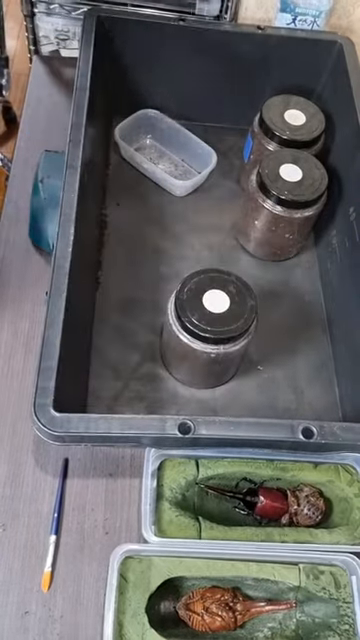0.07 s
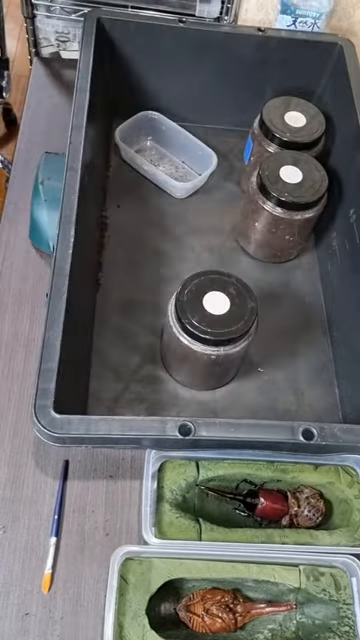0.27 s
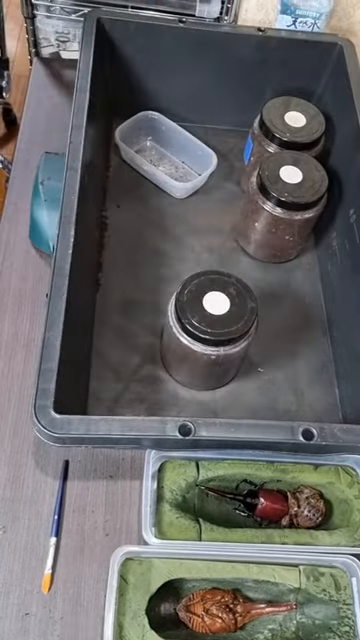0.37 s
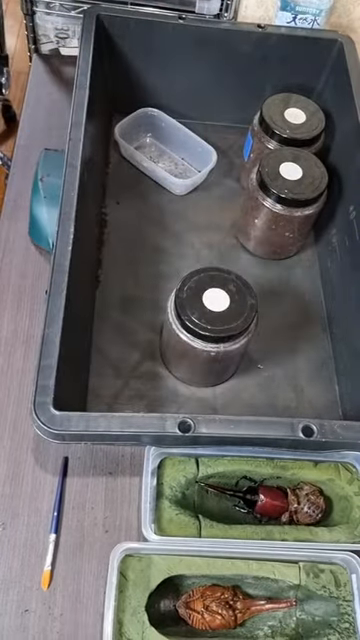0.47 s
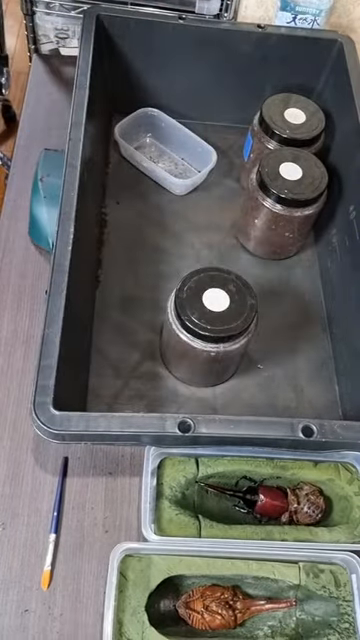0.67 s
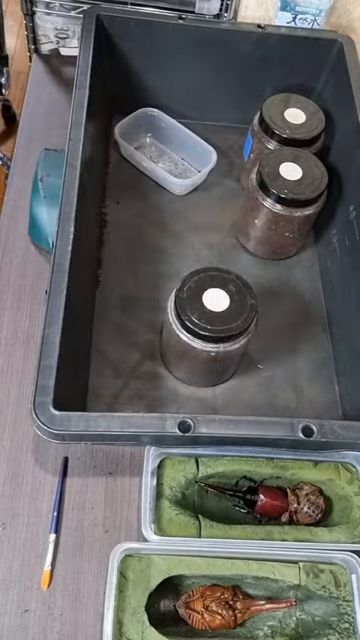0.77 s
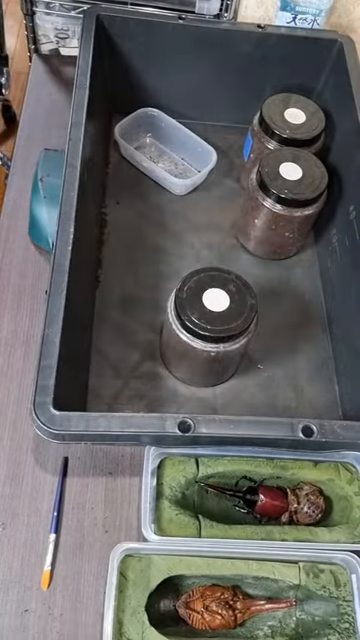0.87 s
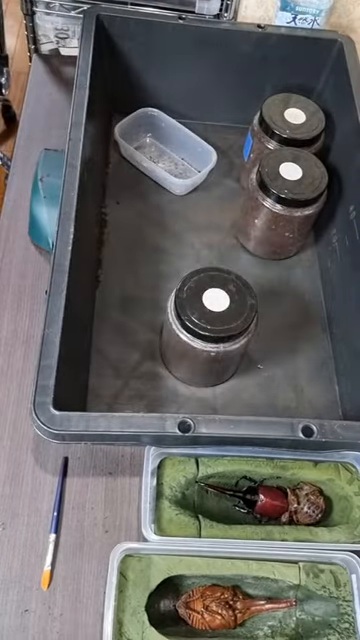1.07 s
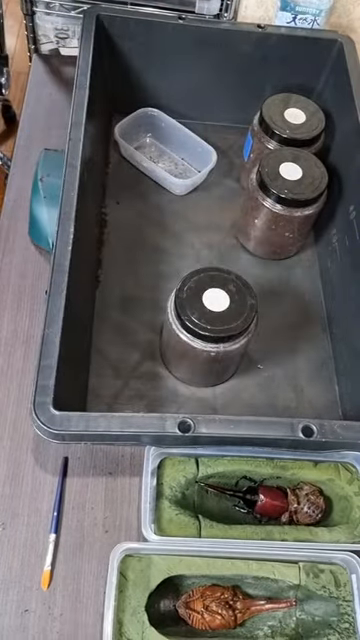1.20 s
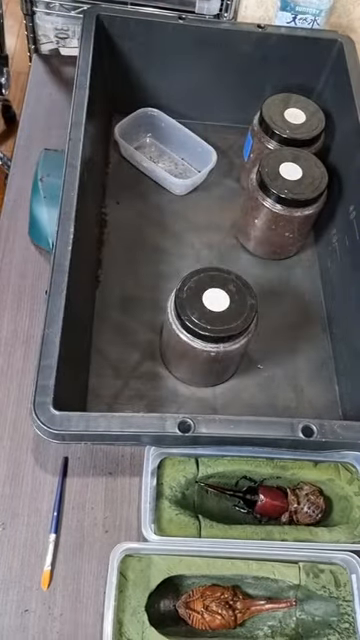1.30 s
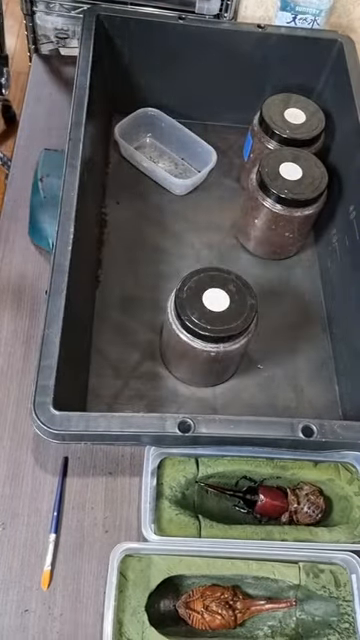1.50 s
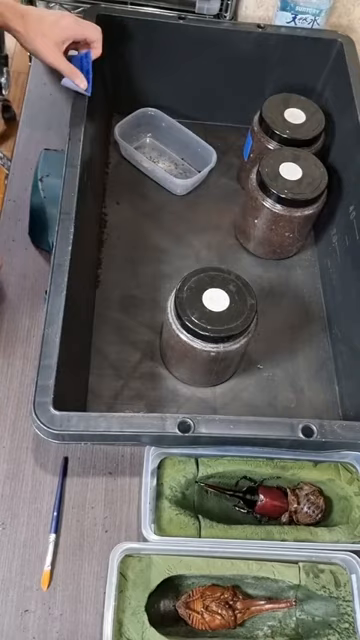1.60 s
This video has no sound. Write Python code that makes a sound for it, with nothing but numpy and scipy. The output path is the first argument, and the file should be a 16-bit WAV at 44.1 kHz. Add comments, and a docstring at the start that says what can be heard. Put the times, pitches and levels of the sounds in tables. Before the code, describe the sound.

Dry, scratchy rustling is heard close by in a quiet room with a faint machine hum. From 0.2 to 0.6 seconds, something scrapes and snaps among plastic boxes, knocking them hollowly on a table, loudest near 0.4. A small tick at 0.7 leads into a lull. Two very short creaks come around 1.1 seconds, then more scrapes, snaps and light knocks until 1.4, leaving only the hum.

```python
"""A faint machine hum in a quiet room; then, close by, something dry is handled among plastic boxes.
It catches and lets go in crisp snaps and drags in short scrapes, dense runs of tiny catches.
Both are friction noise ringing the object's resonances. Harder catches knock hollow plastic on a table.
Near the end, stick and slip judders twice in a creak."""
import sys
import numpy as np
from scipy import signal
from scipy.fft import rfft, irfft
from scipy.io import wavfile

SR = 44100
rng = np.random.default_rng(int(sys.argv[2]) if len(sys.argv) > 2 else 0)


def put_to_file(sound):
    """Save the sound as 16-bit audio at rate SR, in the file named by the first command-line argument."""
    columns = np.atleast_2d(sound).T  # one column per channel
    safe = np.clip(columns, -1, 1)
    whole_steps = np.round(safe * 32767)
    wavfile.write(sys.argv[1], SR, whole_steps.astype(np.int16))


N = 72765
T = np.arange(N) / SR
HZ = np.fft.rfftfreq(N, 1 / SR)
WAVER_HZ = 11.3


def amp(db):
    """Decibels to gain."""
    return 10 ** (np.asarray(db) / 20)


def unit(x):
    """Scale to rms 1."""
    return x / np.sqrt(np.mean(x ** 2) + 1e-20)


def curve(points):
    """(freq_hz, value) rows interpolated onto HZ, log axis."""
    freq_hz, value = np.transpose(points)
    return np.interp(np.log(HZ + 1), np.log(freq_hz), value)


def drift(rate_hz):
    """Random wander up to rate_hz, rms 1."""
    return unit(irfft(rfft(rng.standard_normal(N)) / (1 + (HZ / rate_hz) ** 4), N))


def resonate(x, freq_hz, width_hz):
    """Resonance, peak gain 1."""
    return signal.lfilter(*signal.iirpeak(freq_hz, freq_hz / width_hz, SR), x)


def low_cut(x, edge_hz):
    """Fourth-order high-pass."""
    return signal.sosfilt(signal.butter(4, edge_hz, "high", fs=SR, output="sos"), x)


def stereo_noise(gain):
    """Shaped noise at two microphones: alike in the bass, nearly unrelated in the treble."""
    # left-right likeness: freq_hz, coherence
    likeness = [(30, 1), (100, 0.5), (200, 0.87), (600, 0.93), (1300, 1), (3000, 0.31), (6000, 0),
                (12000, 0.16)]
    # left phase lead: freq_hz, phase_rad
    lead = [(300, 0), (1300, 0.25), (3000, 0.0027), (6000, 1.09), (12000, 1.8)]
    # left over right: freq_hz, level_db
    balance = [(100, 0.5), (300, 0.8), (1200, 0.6), (3000, 0), (6000, 0), (10000, -1.1)]
    common, separate = rfft(rng.standard_normal((2, N)))
    coherence, lean = np.clip(curve(likeness), 0, 1), amp(curve(balance) / 2)
    left = common * np.exp(1j * curve(lead)) * lean
    right = (coherence * common + np.sqrt(1 - coherence ** 2) * separate) / lean
    return irfft(np.array([left, right]) * gain, N)


def hum_line(pitch_hz, waver):
    """Sine wavering in strength and phase, rms 1."""
    strength = 1 + waver * drift(WAVER_HZ)
    return unit(strength * np.sin(2 * np.pi * pitch_hz * T + waver * drift(WAVER_HZ)))


def machine_hum():
    """Three faint lines over a low drone that swells and fades."""
    # hum lines: pitch_hz, level_db, waver_depth
    lines = [(462.9, -56, 0.054), (355, -70, 1), (586, -78.5, 1)]
    # drone envelope: time_s, level_db
    swell = [(0, -66.5), (.07, -53.5), (.14, -65), (.2, -60.5), (.3, -61), (.5, -55.5), (.7, -62.5),
             (.79, -66.5), (.88, -61.5), (1.0, -58), (1.15, -65.5), (1.3, -59.5), (1.46, -68), (1.65, -54)]
    hum = sum(amp(level_db) * hum_line(pitch_hz, waver) for pitch_hz, level_db, waver in lines)
    drone = amp(np.interp(T, *np.transpose(swell))) * hum_line(pitch_hz=225.1, waver=0.25)
    return hum + drone


def room_noise(level_db=-59, flicker_db=1.5):
    """Soft room noise, level flickering slightly."""
    # room spectrum: freq_hz, density_db
    spectrum = [(25, -32), (60, -14.5), (130, -16), (200, 0), (300, -1), (550, 1), (900, -2), (1500, -6),
                (2500, -7.5), (4200, -12.5), (4900, -5.5), (5700, -14), (9000, -13), (14500, -16),
                (16000, -28)]
    return amp(level_db - flicker_db * drift(WAVER_HZ)) * unit(stereo_noise(amp(curve(spectrum))))


def knock(start_s, level_db, pitch_hz):
    """Hollow plastic rings low and briefly, and pushes dully into the table."""
    # hollow-body modes: pitch_ratio, level_db, t60_s
    modes = [(1.001, 2.5, 0.079), (1.15, -14, 0.02), (1.88, -15.5, 0.1)]
    rise_s, push_db, push_t60_s, push_edge_hz = 0.0056, -33, 0.23, 160
    t = np.maximum(T - start_s, 0)
    ring = sum(amp(mode_db - 60 * t / t60_s) * np.sin(2 * np.pi * pitch_hz * ratio * t)
               for ratio, mode_db, t60_s in modes)
    rumble = unit(stereo_noise(1 / (1 + (HZ / push_edge_hz) ** 4)))
    push = amp(push_db - 60 * t / push_t60_s) * rumble
    attack = np.sin(np.pi / 2 * np.minimum(t / rise_s, 1)) ** 2
    return amp(level_db) * attack * (ring + push)


def friction_noise(mid_db, top_db):
    """Noise of one contact, with its own midrange, top and fine spectral ripple."""
    # rubbed-surface spectrum: freq_hz, density_db
    spectrum = [(30, -25), (110, -37), (200, 5), (300, -7), (520, 1.5), (720, 0), (1200, 0), (2000, -3),
                (3200, -2.5), (4500, -0.5), (6000, -1), (8000, -3.5), (12000, -3.5), (15000, -5.5),
                (16300, -24)]
    mid_hz, mid_octaves, top_hz = 926, 0.74, 6000
    ripple_db, ripple_step_hz = 2, 109.4
    mid = np.exp(-0.5 * (np.log2((HZ + 1) / mid_hz) / mid_octaves) ** 2)
    top = 1 / (1 + (top_hz / (HZ + 1)) ** 4)
    ripple = unit(np.interp(HZ / ripple_step_hz, np.arange(len(HZ)), rng.standard_normal(len(HZ))))
    colour = unit(amp(curve(spectrum) + ripple_db * ripple * (1 - top)))
    return stereo_noise(colour * amp(mid_db * mid + top_db * top))


def spot_ring(x, ring_hz, ring_db):
    """Each touched spot favours one resonance."""
    return x + amp(ring_db) * resonate(x, ring_hz, width_hz=126)


def snap(start_s, level_db, mid_db, top_db, ring_hz, ring_db, scatter_db):
    """A catch lets go: sharp crack, then quick scatter off nearby surfaces."""
    rise_s, crack_s, scatter_t60_s = 0.0006, 0.0023, 0.09
    t = np.maximum(T - start_s, 0)
    crack = np.exp(-t / crack_s)
    scatter = amp(scatter_db - 60 * t / scatter_t60_s)
    envelope = amp(level_db) * np.minimum(t / rise_s, 1) * (crack + scatter)
    return spot_ring(envelope * friction_noise(mid_db, top_db), ring_hz, ring_db)


def object_body(contacts):
    """The light object radiates little bass and adds resonances common to all spots."""
    # object resonances: freq_hz, width_hz, gain_db
    rings = [(1191, 75, 0), (1550, 210, -2.5), (2140, 44, 1), (2450, 76, -1), (3040, 240, -5),
             (4090, 80, -4.5), (4680, 180, -5.5), (5440, 150, 0), (5600, 81, 1.5)]
    thin = low_cut(contacts, edge_hz=197)
    return thin + sum(amp(gain_db) * resonate(thin, hz, width_hz) for hz, width_hz, gain_db in rings)


def grip(peak_s, rise_s, hold_s, release_s):
    """Grip builds, sags while it holds, lets go; ramp_db per rise or release time."""
    ramp_db, sag_db_per_s = 25, 105
    t = T - peak_s
    ramps = np.maximum(-t / rise_s, 0) + np.maximum((t - hold_s) / release_s, 0)
    return amp(-ramp_db * ramps - sag_db_per_s * np.clip(t, 0, hold_s))


def scrape(peak_s, rise_s, hold_s, release_s, level_db, mid_db, top_db, ring_hz, ring_db):
    """A dense run of tiny, uneven catches under one stroke."""
    grains_per_s, spread_db, grain_s, smooth_share = 640, 4.5, 0.0018, 0.76
    sizes = amp(spread_db * np.minimum(rng.exponential(1, N), 3))
    catches = sizes * (rng.random(N) < grains_per_s / SR)
    power = signal.lfilter([1], [1, -np.exp(-1 / (grain_s * SR))], catches ** 2)
    grain = np.sqrt(smooth_share + (1 - smooth_share) * power / power.mean())
    envelope = amp(level_db) * grip(peak_s, rise_s, hold_s, release_s) * grain
    return spot_ring(envelope * friction_noise(mid_db, top_db), ring_hz, ring_db)


def creak(peak_s, rise_s, hold_s, release_s, level_db, slip_hz):
    """Uneven stick and slip drives broad resonances; nearby walls scatter the upper ones."""
    # creak resonances: freq_hz, nominal_width_hz, gain_db
    resonances = [(476, 170, 0), (870, 200, -2), (1442, 106, 5.5), (1720, 53, 0), (2710, 180, -3)]
    jitter, slip_decay_cycles = 0.07, 0.087
    scatter_db, scatter_t60_s = -5, 0.044
    cycles = np.cumsum(slip_hz * (1 + jitter * drift(slip_hz))) / SR
    slips = np.exp(-(cycles % 1) / slip_decay_cycles)
    body = sum(amp(gain_db) * resonate(resonate(slips, hz, 2 * width_hz), hz, 2 * width_hz)
               for hz, width_hz, gain_db in resonances)
    direct = amp(level_db) * grip(peak_s, rise_s, hold_s, release_s) * unit(body)
    walls = rng.standard_normal(N) * amp(-60 * T / scatter_t60_s)
    scatter = signal.fftconvolve(direct, walls / np.linalg.norm(walls))[:N]
    side = amp(scatter_db) * low_cut(scatter, edge_hz=1210)
    return np.array([direct + side, direct - side])


def scene():
    """Knocks, snaps, scrapes and creaks over hum and room noise, in stereo."""
    # knocks on plastic: start_s, level_db, pitch_hz
    knocks = [(0.2199, -45, 367), (0.2516, -38.5, 419), (0.271, -50, 410), (0.385, -47, 292),
              (0.412, -28.5, 277), (.441, -42, 298), (0.568, -43, 280), (.589, -43, 289), (.591, -39, 564),
              (0.5991, -39.5, 294), (.7355, -50, 620), (1.189, -38, 305), (1.239, -36.5, 273),
              (1.348, -48.5, 303)]
    # catches letting go: start_s, level_db, mid_db, top_db, ring_hz, ring_db, scatter_db
    snaps = [(0.2209, -38.5, -2, 3, 1270, 5.5, -2), (0.2512, -34, 2, -14, 1300, 7.5, -10),
             (0.2533, -33.5, -9, 6.5, 6740, 9, -9), (.271, -52.5, 1, 8, 1210, 3, -5),
             (0.3794, -36.5, -6.5, 12.5, 1180, 9, -33), (0.4099, -25, 1, 3, 1080, 2.5, -7),
             (0.4285, -33, 6, 1, 3100, 14.5, -6.5), (0.4376, -39.5, -2, 11, 4470, 4, -1.5),
             (0.5864, -26, -9, 1, 3140, 3, -2), (.601, -32, -37, 2, 3220, 16, -10),
             (0.7343, -39, 9, -7, 1220, -4, -8.5), (1.188, -38.5, -0.5, 10, 3250, -1, -3),
             (1.247, -33.5, 1.5, 0.5, 2920, 4.5, -8), (1.3689, -36, -11, 7, 4130, 18, -12)]
    # drags: peak_s, rise_s, hold_s, release_s, level_db, mid_db, top_db, ring_hz, ring_db
    scrapes = [(0.272, 0.06, 0.0069, 0.061, -54.5, 2.5, 7.5, 1090, 11.5),
               (0.356, 0.023, 0.0036, 0.026, -51, 7.5, 3.5, 1490, 9),
               (0.372, 0.014, .003, 0.02, -49.5, -1, 7, 1670, 6),
               (0.385, .01, .002, 0.029, -33.5, -12, -29, 5500, 12),
               (0.416, 0.01, 0.019, 0.036, -32.5, -10, 1, 3000, 7),
               (0.457, 0.018, 0.0034, 0.049, -45, 1, 6, 1310, -3),
               (0.518, 0.042, 0.04, 0.02, -43, -6.5, -1.5, 3210, 4.5),
               (0.565, 0.025, 0.0049, 0.053, -37.5, -10.5, -12, 2290, 6),
               (0.595, 0.0057, 0.013, 0.016, -38.5, 0.5, 10.5, 7260, 0),
               (0.978, 0.025, .004, 0.035, -61.5, 15.5, 2, 1190, -3.5),
               (1.099, 0.018, 0.0067, .012, -49, 5, 0, 1270, 0),
               (1.101, 0.016, 0.024, 0.024, -41, 8.5, 8, 1280, 3),
               (1.154, 0.0083, 0.0018, 0.025, -44, 1.5, 8.5, 1540, 12),
               (1.188, 0.018, 0.0018, 0.01, -35, -11, -8, 3240, 13),
               (1.202, 0.013, 0.0029, 0.02, -34.5, 0.5, -1, 3230, 11),
               (1.238, 0.0029, .002, 0.025, -50.5, 5, 6, 1200, 0),
               (1.264, 0.0063, 0.01, 0.022, -48.5, -3.5, 4, 1500, 18.5),
               (1.2676, .012, .002, 0.037, -42, -5, -14, 3010, 9),
               (1.313, .03, 0.006, 0.017, -44.5, -8, -5, 1630, 19.5),
               (1.316, 0.02, .001, 0.029, -38.5, -6, -4, 2100, 17),
               (1.325, 0.014, 0.015, 0.018, -43, -9, 2.5, 2430, 7),
               (1.348, 0.013, 0.0085, 0.027, -35.5, -3.5, 1.5, 1270, -4),
               (1.371, 0.041, 0.017, 0.024, -39, 0, -0.5, 2780, 11.5)]
    # judders: peak_s, rise_s, hold_s, release_s, level_db, slip_hz
    creaks = [(1.107, 0.02, 0.012, 0.021, -31.5, 441), (1.1553, 0.0075, 0.0031, 0.0091, -34, 455)]
    contacts = sum(snap(*row) for row in snaps) + sum(scrape(*row) for row in scrapes)
    knocking = sum(knock(*row) for row in knocks)
    creaking = sum(creak(*row) for row in creaks)
    return object_body(contacts) + knocking + creaking + machine_hum() + room_noise()


def record(dry):
    """Band limit at 16 kHz."""
    taps = signal.firwin(401, 16000, window=("kaiser", 9), fs=SR)
    return signal.oaconvolve(dry, taps[None], "same")


dry = scene()
out = record(dry)
put_to_file(out)
```